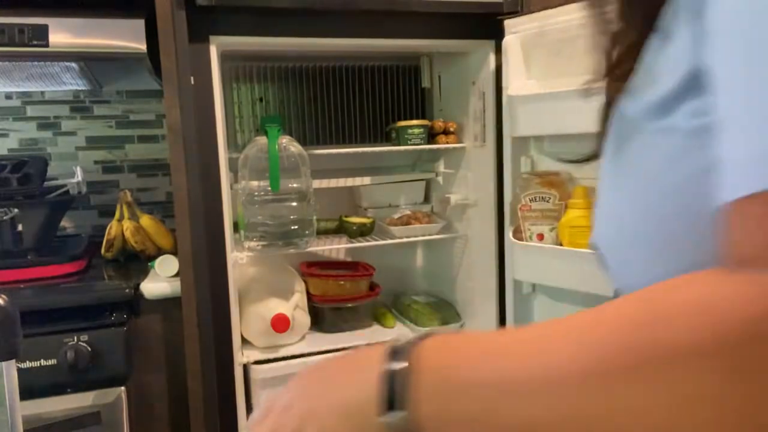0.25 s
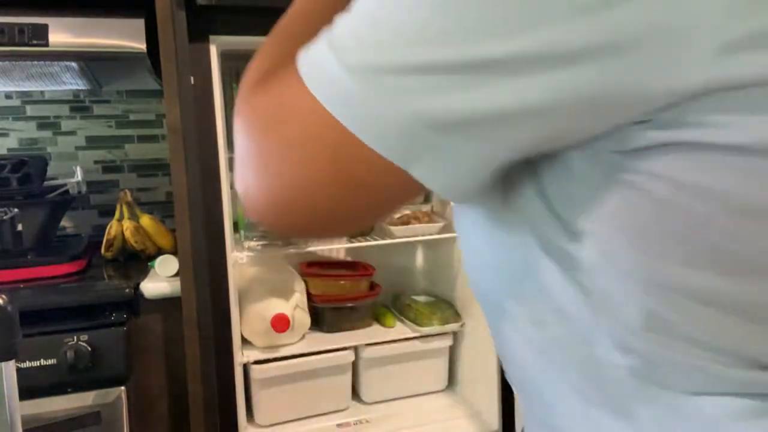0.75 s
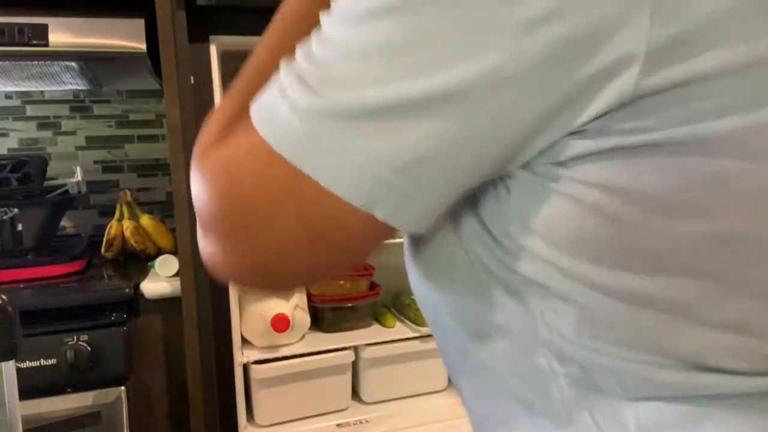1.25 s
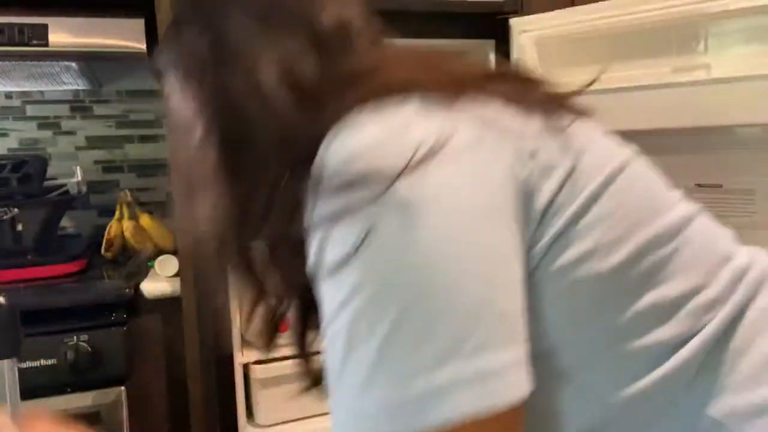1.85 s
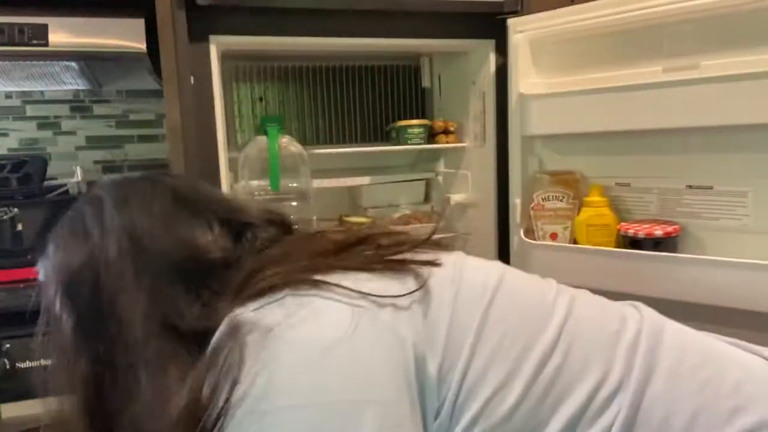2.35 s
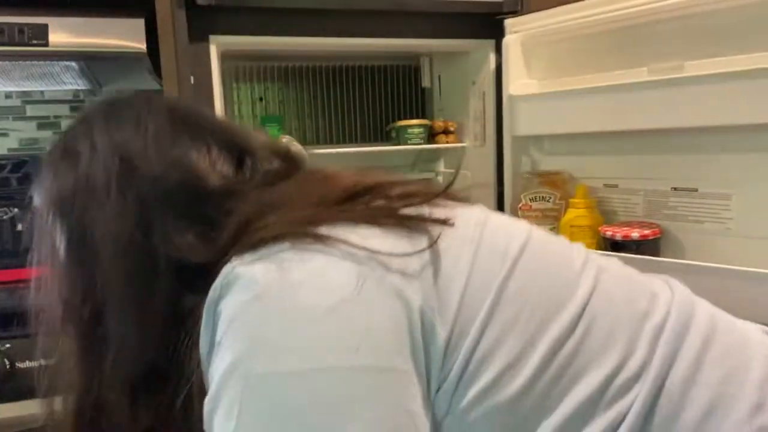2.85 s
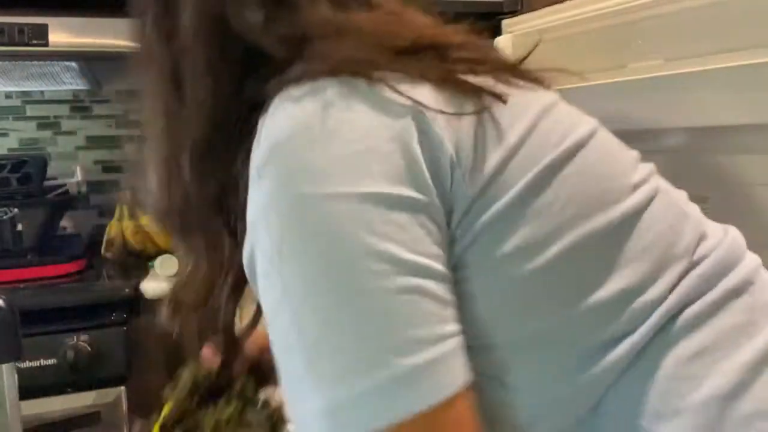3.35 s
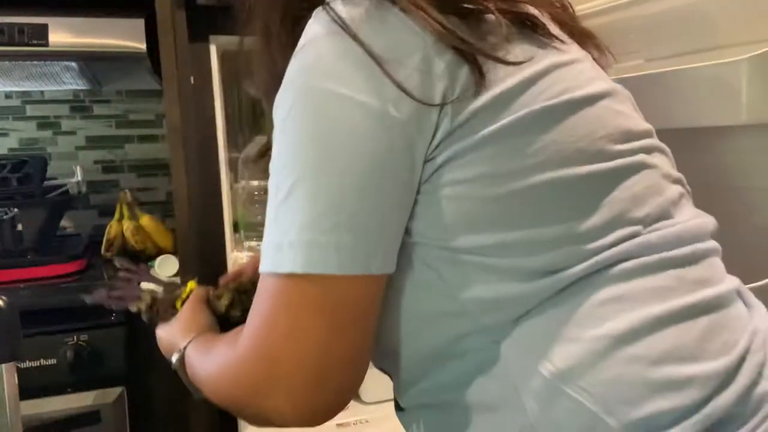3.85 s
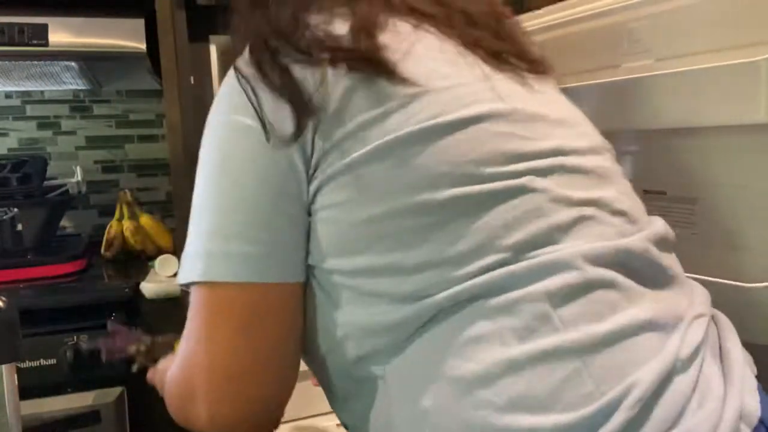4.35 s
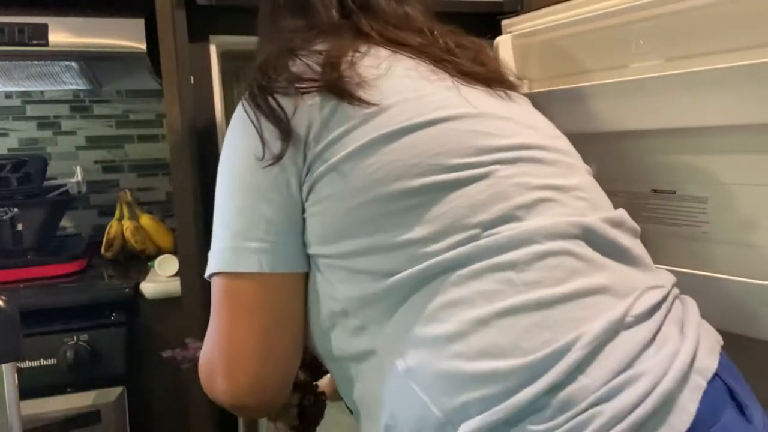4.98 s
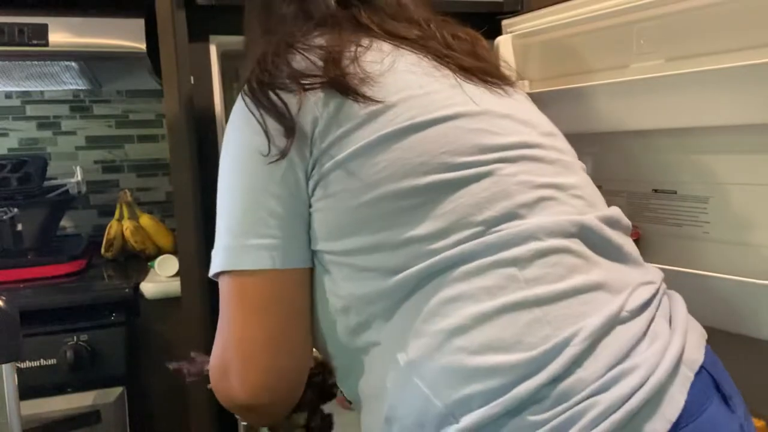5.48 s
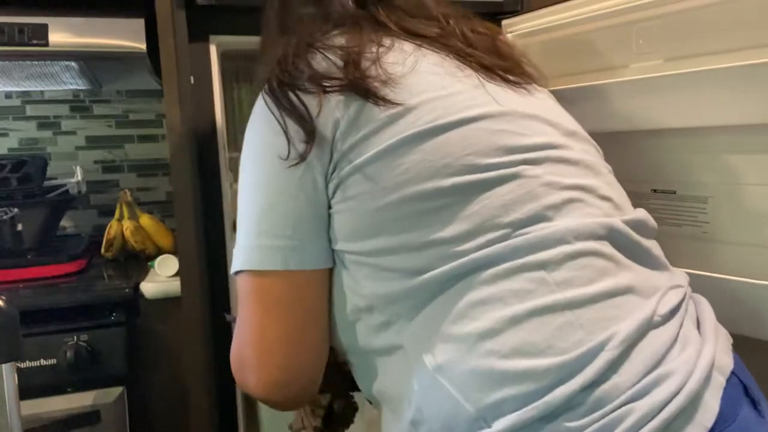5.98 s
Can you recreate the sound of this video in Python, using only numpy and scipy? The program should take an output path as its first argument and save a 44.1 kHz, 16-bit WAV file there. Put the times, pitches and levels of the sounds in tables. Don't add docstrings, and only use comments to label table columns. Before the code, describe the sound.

Steady deep fridge hum with boxy, breathy fan noise fills the whole stretch, wavering slightly. Short dry rustles of leaves come first, ending in quick cutoffs, then three muffled low foot thuds. Containers then bump their shelf in rapid chattering knocks, lighter ones right after, and finally two loud hollow blows. Small room with short reflections, heard near the appliance in stereo.

```python
import sys
import numpy as np
from scipy import signal
from scipy.fft import rfft, irfft
from scipy.io import wavfile
from scipy.ndimage import uniform_filter1d

SR = 44100
rng = np.random.default_rng(int(sys.argv[2]) if len(sys.argv) > 2 else 0)


def wrap_up_sound(samples):
    columns = np.atleast_2d(samples).T
    tamed = np.clip(columns, -1, 1)
    steps = np.round(tamed * 32767).astype(np.int16)
    wavfile.write(sys.argv[1], SR, steps)


def gain_from_db(level_db):
    decades = np.asarray(level_db, float) / 20
    return 10 ** decades


N = 274302


def evened(x):
    return x / np.sqrt(np.mean(x ** 2) + 1e-20)


def read(points, hz):
    f, value = np.transpose(points)
    return np.interp(np.log(hz + 1), np.log(f + 1), value)


def add(mix, s, sound):
    part = mix[..., round(s * SR):][..., :sound.shape[-1]]
    part += sound[..., :part.shape[-1]]


def coloured(x, points):
    hz = np.fft.rfftfreq(x.shape[-1], 1 / SR)
    return irfft(rfft(x) * gain_from_db(read(points, hz)), x.shape[-1])


def ring(x, hz, width):
    return signal.lfilter(*signal.iirpeak(hz, hz / width, SR), x)


def drift(rate, count=24):
    t = np.arange(N) / SR
    rates = np.geomspace(.2, rate, count)
    return evened(sum(np.sin(2 * np.pi * (k * t + rng.random())) / np.sqrt(k) for k in rates))


def motor():
    # f/Hz, left level/dB, right level/dB, phase lag at the right/rad
    hum_lines = [
        (26.41, -55, -54.5, .2),
        (52.8, -60, -58, .2),
        (57.2, -43.5, -42, .3),
        (114.47, -37, -39.7, .3),
        (120, -49, -57, .5),
    ]
    t = np.arange(N) / SR
    out = np.zeros((2, N))
    for hz, left_db, right_db, lag in hum_lines:
        turn = 2 * np.pi * (hz * t + rng.random()) + .15 * drift(1.29)
        level_db = np.array([[left_db], [right_db]]) + .6 * drift(2.5)
        out += np.sqrt(2) * gain_from_db(level_db) * np.cos([turn, turn - lag])
    return out


def patchy(x, depth_db):
    # f/Hz, share
    patch_share = [(150, 0.21), (500, 1.16), (2000, 1.1), (5000, 1), (14000, 0.9)]
    hz, _, z = signal.stft(x, SR, nperseg=1024)
    field = rng.standard_normal(z.shape[1:])
    field = uniform_filter1d(field, size=4, axis=0)
    field = evened(uniform_filter1d(field, size=30, axis=1))
    gain = gain_from_db(depth_db * field * read(patch_share, hz)[:, None])
    return signal.istft(z * gain, SR, nperseg=1024)[1][:, :N]


def air():
    # f/Hz, spectral level/dB per Hz
    flow_noise = [(15, -90), (40, -76), (125, -79), (300, -62), (420, -68), (560, -70.5), (1150, -75.5),
                  (2000, -79), (3000, -82), (5200, -88), (7800, -89.5), (10000, -95.5), (12500, -99),
                  (16000, -105)]
    # f/Hz, width/Hz, spectral level/dB per Hz
    cabinet_modes = [(62.4, 11, -65), (84.5, 36, -59), (157, 28, -47), (179.3, 19.6, -52), (217, 35, -60),
                     (248.7, 43, -55), (255, 13, -66), (337.5, 30, -55), (374.8, 40.5, -53.5),
                     (478.3, 30, -63.5), (657, 32, -68), (836, 67, -70), (973, 29, -70.5),
                     (1094, 42, -71.5), (1430, 180, -78.5), (1700, 70, -78), (2056, 62, -75),
                     (2503, 52, -80), (3340, 41, -82)]
    # f/Hz, likeness (0-1)
    coherence = [(40, .96), (180, .95), (290, .6), (360, .85), (620, .45), (900, .65), (1500, .55),
                 (1800, .3), (2300, .5), (3500, .4), (5000, .15), (6300, .55), (8500, .8), (15000, .8)]
    # f/Hz, lag/rad
    port_lag = [(40, 0.51), (200, 0.43), (290, 0.74), (360, 0.69), (550, 2.34), (700, 1.32), (1250, 2.28),
                (1450, 0.9), (2300, 4.17), (3600, 4.7), (6000, 6.8), (9000, 9.39), (12000, 12.12),
                (15000, 15.9)]
    # f/Hz, left minus right/dB
    port_lean = [(27, -1), (60, -6), (110, 1), (200, 0), (260, -4), (330, -1), (680, 1.5), (1250, 3),
                 (2300, 1.5), (4230, 1.5), (7770, 0.5), (9000, 6), (15000, -5)]
    # t/s, level/dB
    body_shade = [(0.0, .3), (.5, .3), (1.1, -.7), (1.8, -.1), (2.4, -.3), (2.8, .8), (3.2, -.1), (3.6, .6),
                  (4.2, -.1), (4.9, .6), (5.4, .4), (5.9, -.6), (6.22, .2)]
    shade_share = [.4, 1.1, .9]

    hz = np.fft.rfftfreq(N, 1 / SR)
    power = gain_from_db(2 * read(flow_noise, hz))
    for f, width, db in cabinet_modes:
        power += gain_from_db(2 * db) / (1 + (2 * (hz - f) / width) ** 2) ** 2

    first, other = rfft(rng.standard_normal((2, N)))
    same = np.clip(read(coherence, hz), 0, 1)
    second = same * np.exp(-1j * read(port_lag, hz)) * first + np.sqrt(1 - same ** 2) * other
    half_lean_db = read(port_lean, hz) / 2
    pair = np.sqrt(power * SR / 2) * np.array([first * gain_from_db(half_lean_db), second * gain_from_db(-half_lean_db)])

    low = 1 / (1 + (hz / 520) ** 4)
    high = 1 / (1 + (1700 / (hz + 1)) ** 4)
    shade_db = np.interp(np.arange(N) / SR, *np.transpose(body_shade))
    total = np.zeros((2, N))
    for band, follow in zip((low, 1 - low - high, high), shade_share):
        total += irfft(pair * band, N) * gain_from_db(follow * shade_db)
    return patchy(total, 1.25) * gain_from_db(.5 * drift(11.0))


def bumps(rows, modes, mode_db, click_db, thump_db):
    # f/Hz, level/dB
    click_colour = [(400, 2), (900, 15), (2000, 3.5), (4000, -4.5), (8000, -12.5), (12000, -21),
                    (16000, -34)]
    chatter_s, looser_s_per_db = .022, .0008
    damp_per_khz = .5

    body, thump, click = np.zeros((3, N))
    t = np.arange(4000) / SR
    blow = 5.63 * t / 0.00051 * np.exp(1 - t / 0.0003)
    for s, db, low_db, high_db in rows:
        t60 = max(chatter_s - looser_s_per_db * db, .008)
        onset = 1 - np.exp(-t / 0.0019)
        chatter = rng.standard_normal(len(t)) * gain_from_db(-60 * t / t60) * onset
        add(body, s, gain_from_db(db) * (0.4 * blow + chatter))
        add(thump, s, gain_from_db(db + low_db) * (0.55 * blow + .1 * chatter))
        add(click, s, gain_from_db(db + high_db) * chatter)

    (shelf_hz, shelf_width, _), *upper = modes
    rung = np.zeros(N)
    for k, (f, width, db) in enumerate(upper):
        damping = 1 + damp_per_khz * f / 1000
        sign = (-1) ** k
        rung += sign * gain_from_db(db) / np.sqrt(damping) * ring(body, f, 1.11 * width * damping)
    shelf = gain_from_db(thump_db) * ring(thump, shelf_hz, shelf_width)
    return gain_from_db(mode_db) * rung + shelf + gain_from_db(click_db) * coloured(click, click_colour)


def containers():
    # t/s, blow level/dB, weight on the shelf/dB, hardness of the edge/dB
    first_bumps = [(4.545, -34, -18, -11), (4.678, -25, -22, -26), (4.750, -14, -12, -18.5),
                   (4.756, -15, -3, -24), (4.761, -12.5, 4, -25), (4.782, -19, -5, -34),
                   (4.797, -14.5, -12, -22), (4.808, -11, -8, -30), (4.824, -16, -8, -17),
                   (4.832, -13, -14, -19), (4.845, -11, -6, -30), (4.857, -19, -15, -34),
                   (4.922, -22.5, -8, -29), (4.95, -22, -9, -40), (5.026, -28, -15, -27)]
    second_bumps = [
        (5.198, -26, -18, -11),
        (5.214, -21, -17, -24),
        (5.226, -20, -16, -27),
        (5.236, -20, -14, -23),
        (5.250, -16, -10, -27),
        (5.262, -13, -9, -30),
        (5.288, -21, -15, -29),
        (5.304, -21, -13, -33),
    ]
    third_bumps = [
        (6.128, -5, -24, -26),
        (6.136, -11, -22, -18),
        (6.144, -17, -17, -24),
        (6.153, -16, -16, -20),
        (6.164, -6, -13, -24),
        (6.170, -11, -8, -29),
        (6.180, -18, -.6, -25),
        (6.196, -30, -3, -26),
    ]
    # f/Hz, width/Hz, level/dB
    first_modes = [(138, 30, 0), (262, 11.5, 4), (436, 17, 0), (520, 28, -8), (667, 30, -5), (873, 40, -7),
                   (1050, 27, -24), (1260, 66, -25), (1610, 32, -7.5), (2080, 49, -26)]
    second_modes = [(146, 46, -2), (282, 11, -1.5), (412, 28, 1), (650, 44, -8), (880, 40, -4.5),
                    (1270, 40, -28), (1440, 25, -4), (2210, 40, -26)]
    third_modes = [(182, 41, 0), (274, 14.5, 1), (452, 21.5, -0.5), (660, 38, -10.5), (974, 23, -5.5),
                   (1030, 26, -14), (1280, 71, -16), (1650, 29, -39), (2150, 74, -10)]
    first = bumps(first_bumps, first_modes, mode_db=11, click_db=14.5, thump_db=13.2)
    second = bumps(second_bumps, second_modes, mode_db=12, click_db=12.5, thump_db=5.1)
    third = bumps(third_bumps, third_modes, mode_db=10.3, click_db=12.5, thump_db=9.4)
    return first + second + third


def rustle():
    # t/s of the firmest touch, level/dB, build-up/s
    hand_strokes = [(2.39, -63, .04), (2.436, -60, .008), (2.655, -54, .22), (2.725, -54, .07),
                    (2.965, -54, .15), (4.752, -63, .006), (4.828, -48.5, .012), (5.2, -65, .01),
                    (5.26, -69, .05), (6.135, -60, .02), (6.17, -62, .1)]
    # f/Hz, level/dB
    leaf_colour = [(3000, -5), (5000, -5), (8000, 1), (11000, 3.5), (14000, -2.5), (16000, -0.5)]
    # t/s, level/dB, f/Hz
    leaf_ticks = [
        (2.438, -49, 14000),
        (5.79, -65, 14000),
    ]
    build_db, hold_s, let_go_db_per_s = 20.5, .015, 350

    t = np.arange(N) / SR
    level = np.zeros(N)
    for s, db, build in hand_strokes:
        rise_db = build_db * (s - t) / build
        fall_db = let_go_db_per_s * np.maximum(t - s - hold_s, 0)
        level += gain_from_db(db - np.where(t < s, rise_db, fall_db))
    roughness_db = 1.5 * evened(uniform_filter1d(rng.standard_normal(N), 60))
    grains = rng.standard_normal(N) * gain_from_db(roughness_db)
    out = gain_from_db(3.0) * level * evened(coloured(grains, leaf_colour))
    for s, db, hz in leaf_ticks:
        puff = rng.standard_normal(900) * gain_from_db(db - 60 * t[:900] / 0.018)
        add(out, s, 2.3 * ring(puff, hz, 0.6 * hz))
    return out


def thuds():
    # t/s, level/dB, f/Hz, t60/s
    floor_thuds = [
        (4.121, -32, 59.6, 0.24),
        (4.27, -30, 58, .25),
        (4.42, -28, 67, 0.22),
        (5.97, -36, 60, 0.12),
    ]
    out = np.zeros(N)
    t = np.arange(SR // 2) / SR
    for s, db, hz, t60 in floor_thuds:
        envelope = gain_from_db(db - 60 * t / t60) * (1 - np.exp(-t / 0.016))
        add(out, s, envelope * 2.3 * np.sin(2 * np.pi * hz * t))
    return out


def kitchen(x):
    # f/Hz, t60/s
    room_decay = [(100, 0.19), (400, 0.12), (1500, 0.15), (5000, 0.15), (14000, 0.066)]
    taps = np.zeros((2, SR // 2))
    at = np.arange(80, SR // 2 - 20, 20)
    at = at + rng.integers(0, 20, (2, len(at)))
    np.put_along_axis(taps, at, rng.choice([-1., 1.], at.shape), 1)
    taps[1] += coloured(0.5 * (taps[0] - taps[1]), [(200, 4.5), (700, -14.5)])
    hz, t, z = signal.stft(taps, SR, nperseg=256)
    decay = gain_from_db(-60 * t / read(room_decay, hz)[:, None])
    tail = signal.istft(z * decay, SR, nperseg=256)[1]
    return signal.fftconvolve(x[None], tail / np.linalg.norm(tail[0]), axes=1)[:, :N]


def scene():
    hands = containers()
    leaves = rustle()
    leaves_pair = np.array([leaves, np.roll(leaves, 7)])
    hands_pair = np.array([np.roll(hands, 2), hands]) * gain_from_db(np.array([[-.6], [.6]]))
    to_room = coloured(hands, [(120, -15), (260, -2.5), (500, -0.16)]) + 0.69 * leaves
    fridge = motor() + air()
    return fridge + thuds() + hands_pair + leaves_pair + gain_from_db(2.0) * kitchen(to_room)


def low_pass(x):
    return signal.sosfilt(signal.butter(12, 15750, fs=SR, output="sos"), x)


def record(dry):
    return low_pass(dry)


dry = scene()
out = record(dry)
wrap_up_sound(out)
```